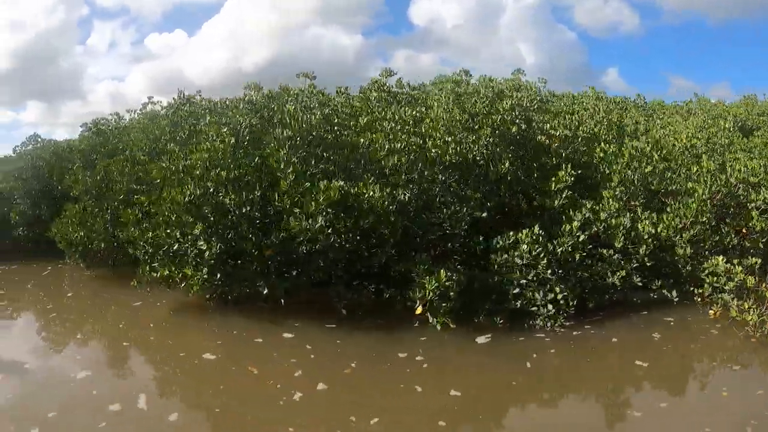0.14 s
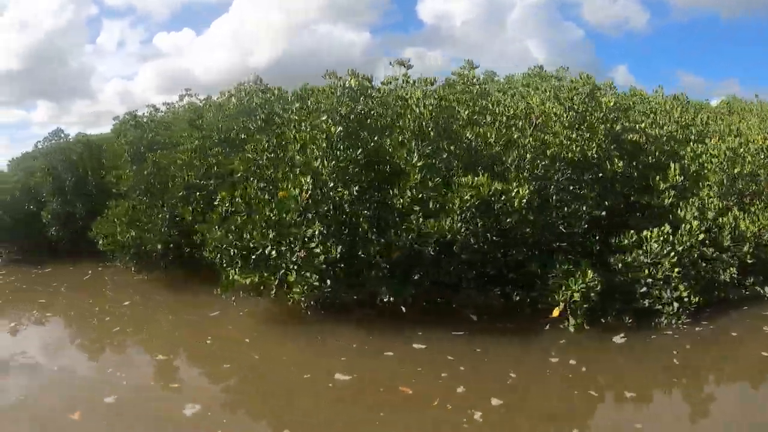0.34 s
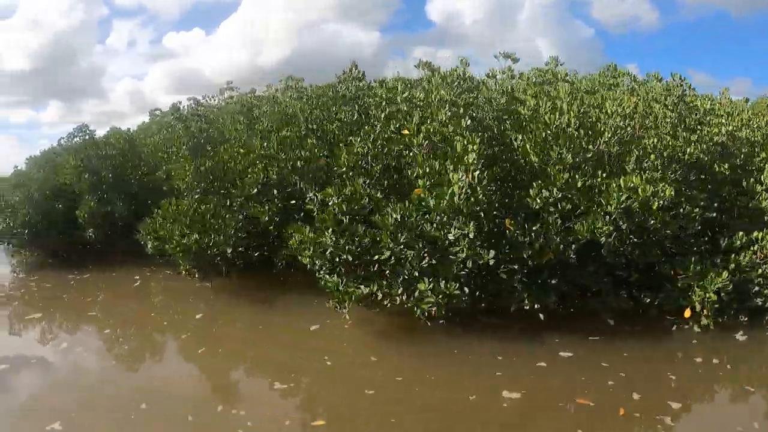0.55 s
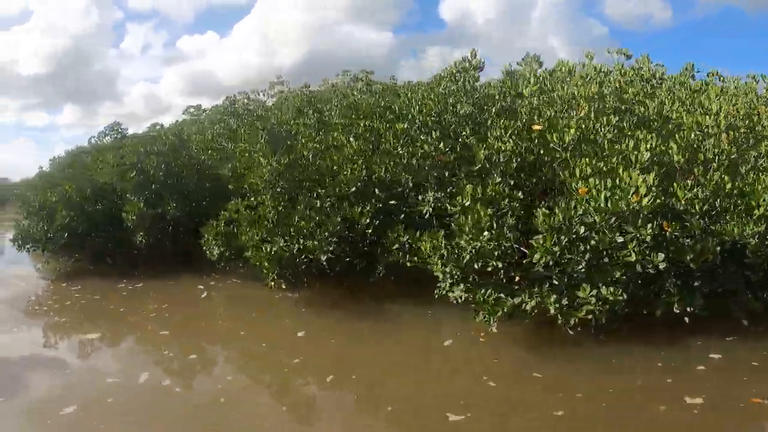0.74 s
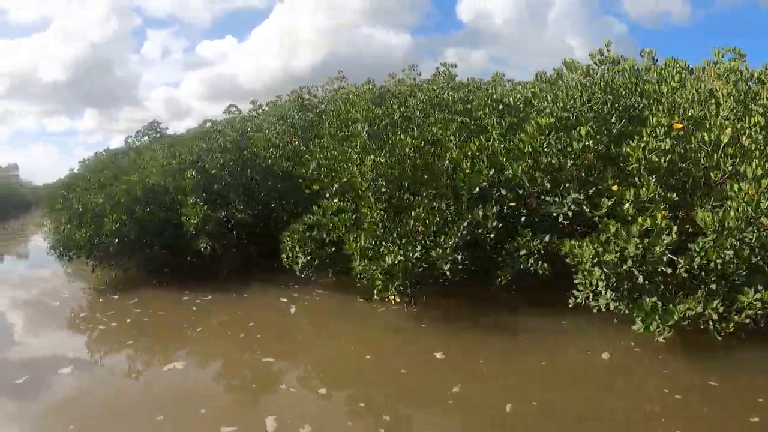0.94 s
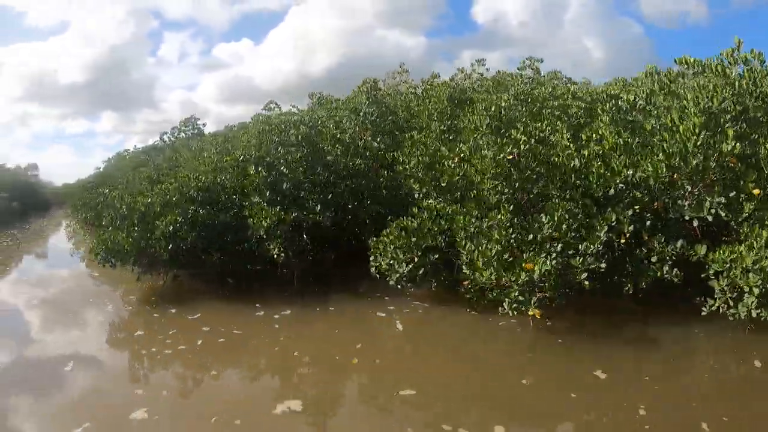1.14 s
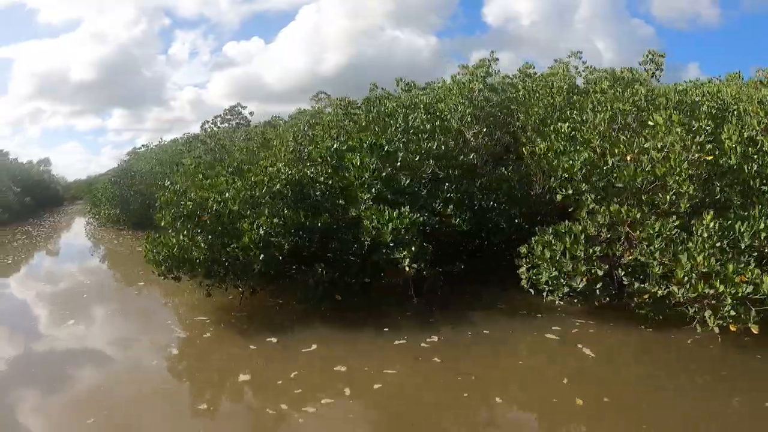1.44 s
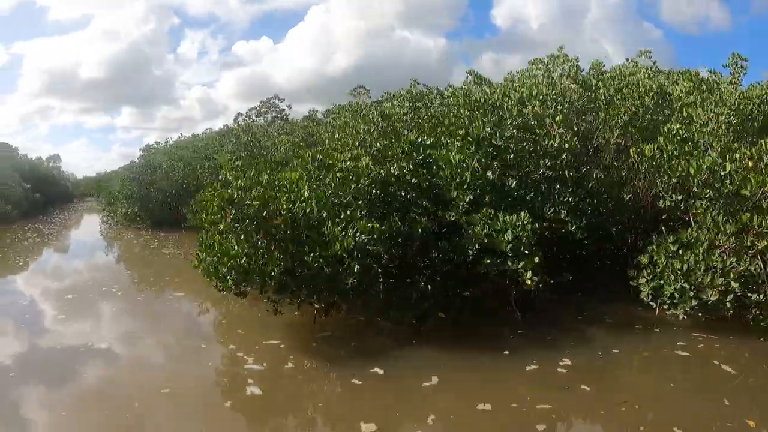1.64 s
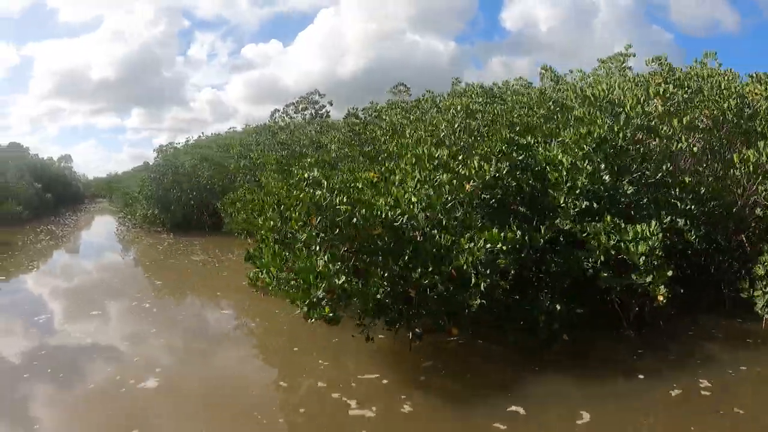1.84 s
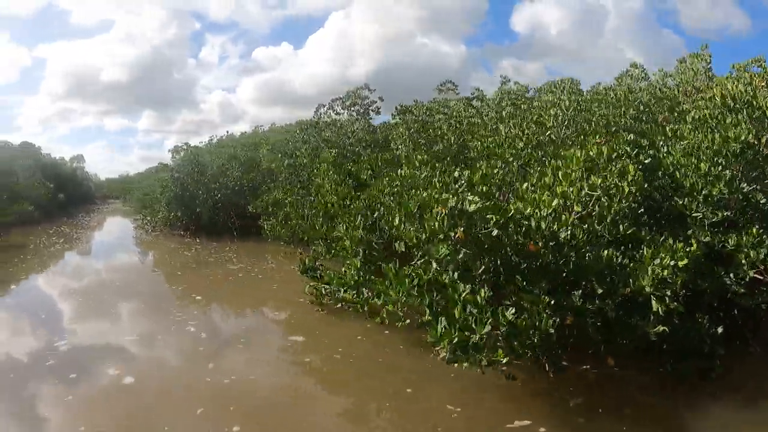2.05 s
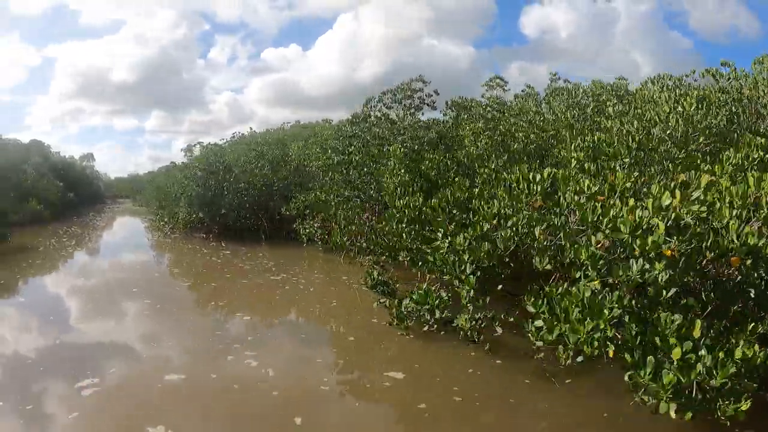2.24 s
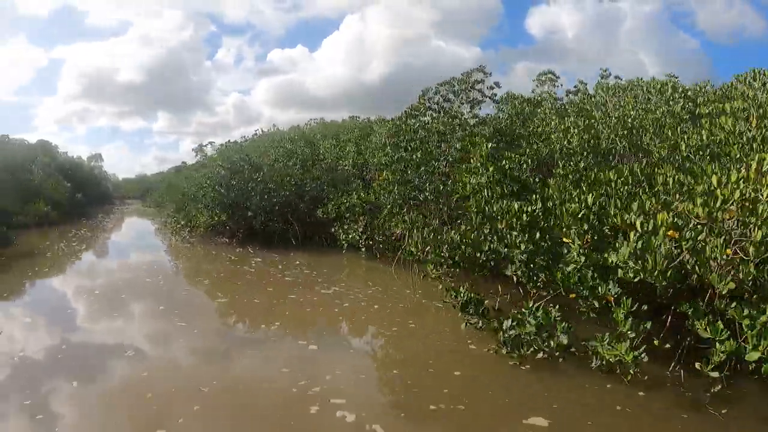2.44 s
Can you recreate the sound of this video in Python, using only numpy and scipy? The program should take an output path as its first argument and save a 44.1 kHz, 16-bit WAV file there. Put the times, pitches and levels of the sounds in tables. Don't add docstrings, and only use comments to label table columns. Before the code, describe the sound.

An outboard motor drones at constant cruising speed throughout, a deep buzzing hum with a throaty, pulsing exhaust and propeller roar. Wind thumps low on the onboard microphone, strongest at the start and around 0.45 seconds. Smooth wake hiss and fine bubbling spray swell slightly near 0.9 seconds, then ease. The engine's tone colour shifts subtly around 1.25 seconds; barely audible high insect trill enters after 2.2 seconds.

```python
import sys
import numpy as np
from scipy import signal
from scipy.fft import rfft, irfft, next_fast_len
from scipy.io import wavfile

SR = 44100
rng = np.random.default_rng(int(sys.argv[2]) if len(sys.argv) > 2 else 0)


def convert_level_to_amplitude(level_db):
    exponent = np.asarray(level_db, float) / 20
    return 10 ** exponent


def unload_audio(sound):
    columns = np.transpose(np.atleast_2d(sound))
    steps = np.round(np.clip(columns, -1, 1) * 32767)
    wavfile.write(sys.argv[1], SR, steps.astype(np.int16))


N = 114660


def rms_one(x):
    return x / np.sqrt(np.mean(x ** 2) + 1e-20)


def in_time(rows):
    time_s, value = np.transpose(rows)
    return np.interp(np.arange(N) / SR, time_s, value)


def smooth_rise(mid_s, width_s):
    return .5 + .5 * np.tanh((np.arange(N) / SR - mid_s) / width_s)


def drift(rate_hz):
    pole = np.exp(-80 * np.pi * rate_hz / SR)
    noise = rng.standard_normal(N // 40 + 2002)
    slow = signal.lfilter([1], [1, -2 * pole, pole * pole], noise)[2000:]
    return np.interp(np.arange(N) / 40, np.arange(len(slow)), rms_one(slow - slow.mean()))


def band_pass(x, order, edges_hz):
    return signal.sosfilt(signal.butter(order, edges_hz, "band", fs=SR, output="sos"), x)


def banded_noise(colour, patchy_db, flicker_hz, shared):
    hz, db = np.transpose(colour)
    edges_hz = hz[0] * 2 ** np.arange(-1 / 6, np.log2(hz[-1] / hz[0]) + 1 / 3, 1 / 3)
    edges_hz = edges_hz[edges_hz < SR * .45]
    size = next_fast_len(N + SR)
    bins_hz = np.arange(size // 2 + 1) * SR / size
    shape = convert_level_to_amplitude(np.interp(np.log(bins_hz + 1), np.log(hz), db))
    noise = irfft(rfft(rng.standard_normal((2, size))) * shape, size)
    together = drift(flicker_hz / 2)
    out = 0
    for k, (low_hz, high_hz) in enumerate(zip(edges_hz, edges_hz[1:])):
        band = band_pass(noise[k % 2], 2, [low_hz, high_hz])[-N:]
        flicker_db = patchy_db * (shared * together + drift(flicker_hz))
        out = out + band * convert_level_to_amplitude(flicker_db)
    return rms_one(out)


def insects():
    mid_hz, width_hz, level_db = 13100, 3200, -68
    band = band_pass(rng.standard_normal(N), 2, [mid_hz - width_hz / 2, mid_hz + width_hz / 2])
    nearness = smooth_rise(mid_s=2.22, width_s=.14)
    return convert_level_to_amplitude(level_db + .8 * drift(8.0)) * nearness * rms_one(band)


# time in seconds, level in dB.
WIND_LEVEL = [(0, -20), (.25, -26), (.45, -19.5), (.7, -24.5), (1.0, -26), (1.3, -25.5), (1.6, -25),
              (1.9, -25), (2.2, -26.5), (2.4, -25.5), (2.6, -47.5)]
# frequency in Hz, density in dB per Hz.
WIND_COLOUR_DB = [(4, -8), (12, -5), (25, -3.5), (42, -1.5), (90, -1.5), (140, -4), (200, -8), (300, -24)]


def wind():
    buffeting = banded_noise(WIND_COLOUR_DB, patchy_db=1.6, flicker_hz=6.0, shared=.1)
    return convert_level_to_amplitude(in_time(WIND_LEVEL)) * buffeting


def fizz():
    bursts_per_s, ring_cycles = 2500, 4.8
    sizes = convert_level_to_amplitude(1.4 * np.minimum(rng.exponential(1, N), 4)) * rng.choice([-1, 1], N)
    bursts = sizes * (rng.random(N) < bursts_per_s / SR)
    pitch = rng.integers(0, 16, N)
    out = 0
    for k, hz in enumerate(np.geomspace(2500, 6000, num=16)):
        decay = convert_level_to_amplitude(-60 * hz / ring_cycles / SR)
        w = 2 * np.pi * hz / SR
        ring = [1, -2 * decay * np.cos(w), decay * decay]
        out = out + signal.lfilter([0, np.sin(w)], ring, bursts * (pitch == k) + 1e-18)
    return rms_one(band_pass(out, 4, [2200, 6500]))


# time in seconds, level in dB.
WAKE_LEVEL = [(0, -42.5), (.3, -42), (.6, -40), (.9, -39), (1.2, -39.2), (1.5, -39.5), (1.8, -40),
              (2.1, -41), (2.35, -42), (2.6, -42.5)]
# frequency in Hz, density in dB per Hz.
WAKE_COLOUR_DB = [(900, -7.5), (1500, -0.5), (3000, -4), (4600, -8.5), (8300, -18.5), (10500, -31.5),
                  (12200, -40.5), (15900, -53)]


def wake():
    hiss = banded_noise(WAKE_COLOUR_DB, patchy_db=0.37, flicker_hz=13.0, shared=0.14)
    level_db = in_time(WAKE_LEVEL)
    fizz_db = -6.5 + 1.2 * (level_db - level_db.mean())
    return convert_level_to_amplitude(level_db + 1.5) * (hiss + convert_level_to_amplitude(fizz_db) * fizz())


# time in seconds, level in dB.
CHURN_LEVEL = [(0, -36), (.3, -33.5), (.6, -35), (.9, -33.5), (1.2, -32.5), (1.5, -32.5), (1.8, -33.5),
               (2.1, -33), (2.35, -35), (2.6, -34)]
# frequency in Hz, density in dB per Hz.
CHURN_COLOUR_DB = [(100, -5.5), (200, -.5), (300, -1.5), (400, -7.5), (480, -9), (620, -15.5), (1000, -14),
                   (1600, -29.5)]


def churn(angle_rad):
    lift_db, gate_depth = 8, 0.41
    cowl_hz, cowl_width_hz, cowl_db = 589, 34, -6
    level_db = in_time(CHURN_LEVEL)
    gate = 1 + gate_depth * (.6 * np.cos(3 * angle_rad) + np.cos(angle_rad))
    roar = gate * banded_noise(CHURN_COLOUR_DB, patchy_db=1.8, flicker_hz=10.0, shared=0.4)
    resonance = signal.iirpeak(cowl_hz, cowl_hz / cowl_width_hz, fs=SR)
    cowl = rms_one(signal.lfilter(*resonance, rng.standard_normal(N)))
    cowl_level_db = level_db + cowl_db + 0.82 * (level_db - level_db.mean())
    return convert_level_to_amplitude(level_db + lift_db) * roar + convert_level_to_amplitude(cowl_level_db) * cowl


# multiple of crank speed, level in dB, change over the listener's turn in dB.
CRANK_ORDERS = [(1, -33, -1), (2, -33, -2.5), (3, -16.5, 0.2), (4, -23.5, -3.5), (5, -39.5, -8),
                (6, -31.5, 10), (7, -32.5, 0), (8, -50, 11), (9, -53, 6), (10, -56, 5), (11, -49.5, 11.3),
                (12, -47, 0.1), (13, -47.5, -5.5), (14, -60.5, 3.5), (15, -59.5, 9.5), (16, -48.5, -5.5),
                (17, -54, 0.7), (18, -57.5, 13), (19, -49, 4), (24, -52.5, 3.5), (25, -54, 4.5),
                (26, -66.5, 5)]
INVERTED_ORDERS = (1, 2, 5, 7, 9, 11, 17, 19)


def orders(angle_rad):
    waver_db, waver_hz = 1.6, 2.5
    shared_slip_rad, own_slip_rad, jitter_rad = .06, .3, .012
    turn = smooth_rise(mid_s=1.25, width_s=.2) - .5
    slip = shared_slip_rad * drift(1.24)
    jitter = jitter_rad * drift(19.0)
    out = 0
    for multiple, level_db, change_db in CRANK_ORDERS:
        k = int(round(multiple))
        share = .3 if k in (3, 4) else 1
        order_db = level_db + change_db * turn + waver_db * share * drift(waver_hz)
        wander_rad = slip * max(k - 4, 0) + k * jitter + own_slip_rad * share * drift(2.0)
        sign = -1 if k in INVERTED_ORDERS else 1
        out = out + sign * np.sqrt(2) * convert_level_to_amplitude(order_db) * np.cos(k * angle_rad + wander_rad)
    return out


# time in seconds, turns per second in Hz.
CRANK_SPEED = [(0, 56.15), (.3, 56.3), (.6, 56.25), (1.0, 56.27), (1.25, 56.42), (1.5, 56.1), (1.9, 56.27),
               (2.05, 56.12), (2.35, 55.98), (2.6, 56.15)]


def scene():
    angle_rad = 2 * np.pi * np.cumsum(in_time(CRANK_SPEED)) / SR
    mix = insects() + wind() + wake() + churn(angle_rad) + orders(angle_rad)
    return mix[None]


def top_cut(x):
    return signal.sosfilt(signal.butter(12, 15750, fs=SR, output="sos"), x)


def record(dry):
    top = .75
    mix = top * np.tanh(dry / top)
    return top_cut(mix)


dry = scene()
out = record(dry)
unload_audio(out)
```